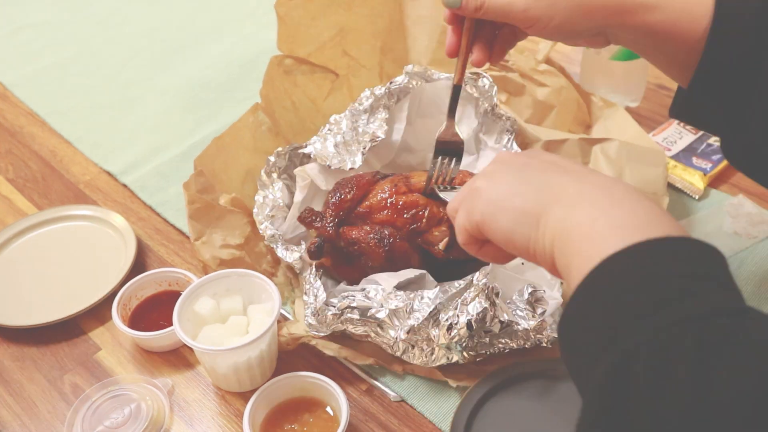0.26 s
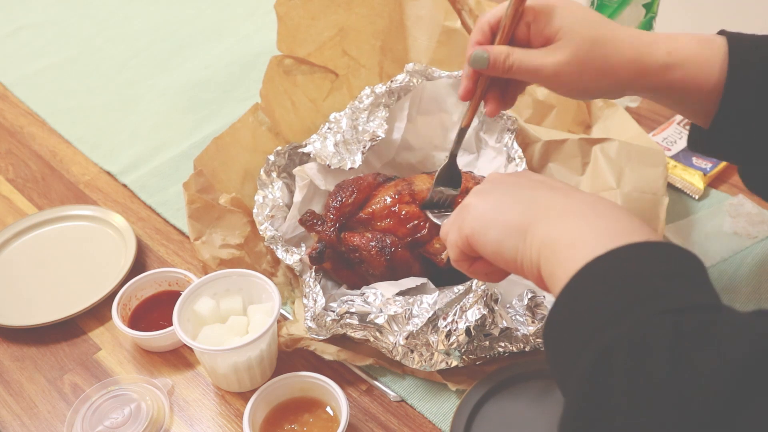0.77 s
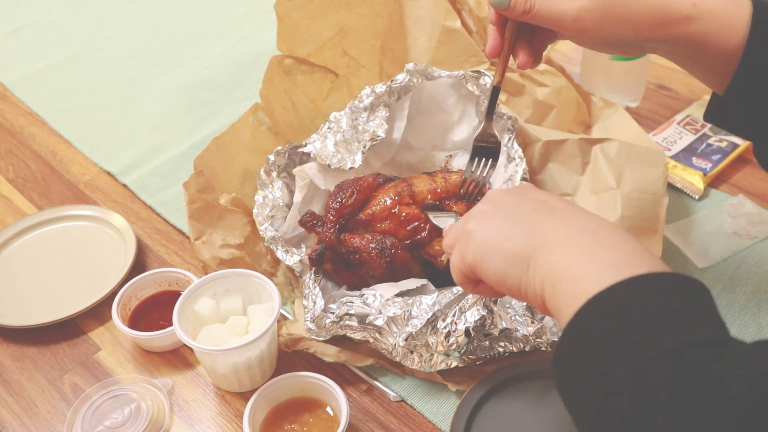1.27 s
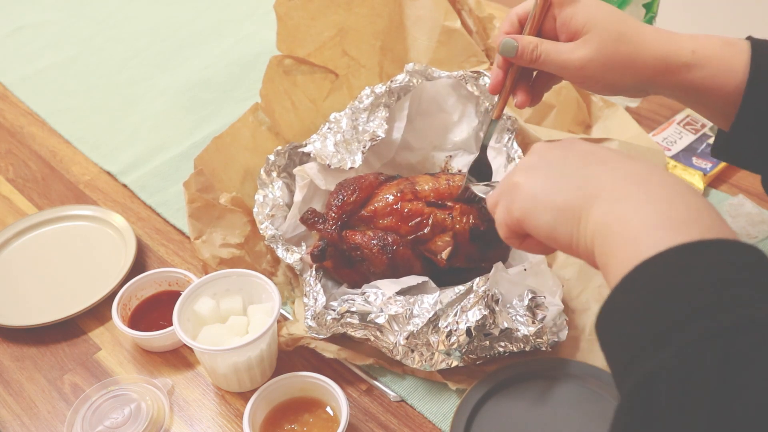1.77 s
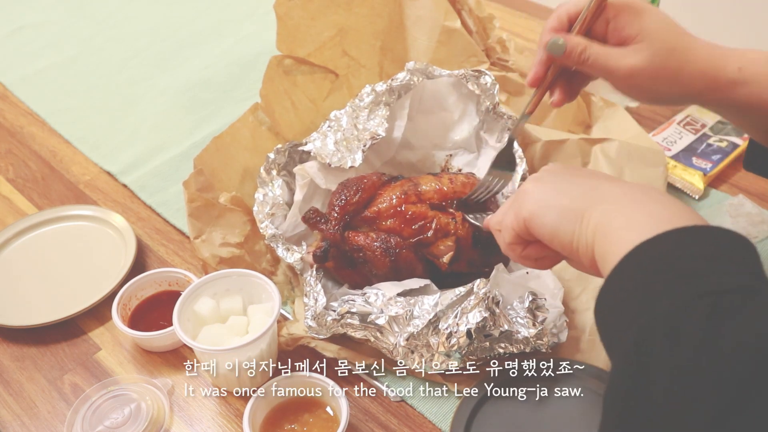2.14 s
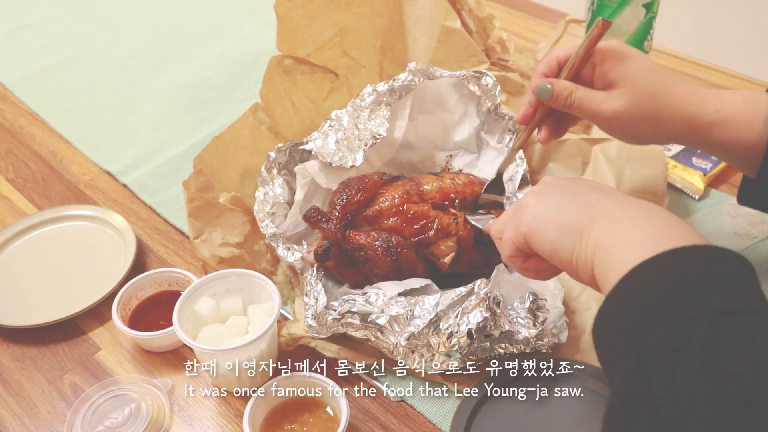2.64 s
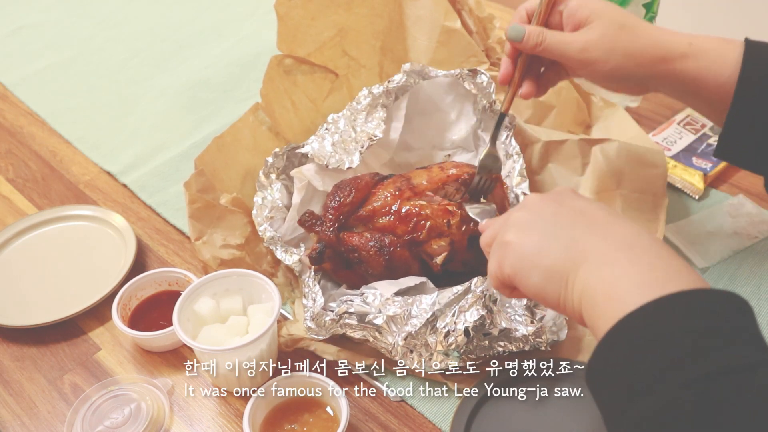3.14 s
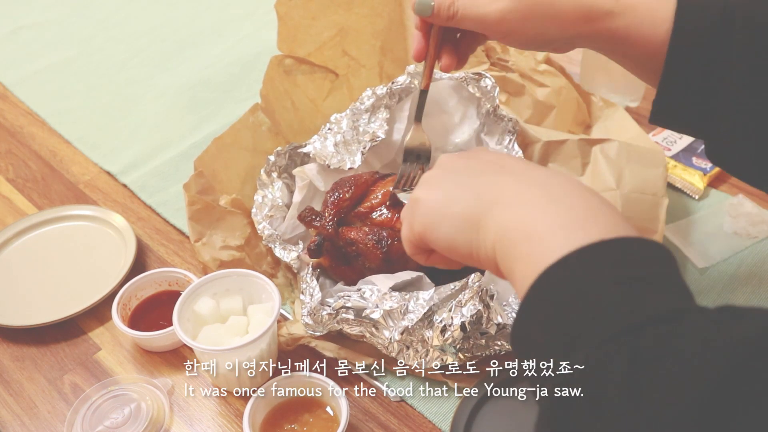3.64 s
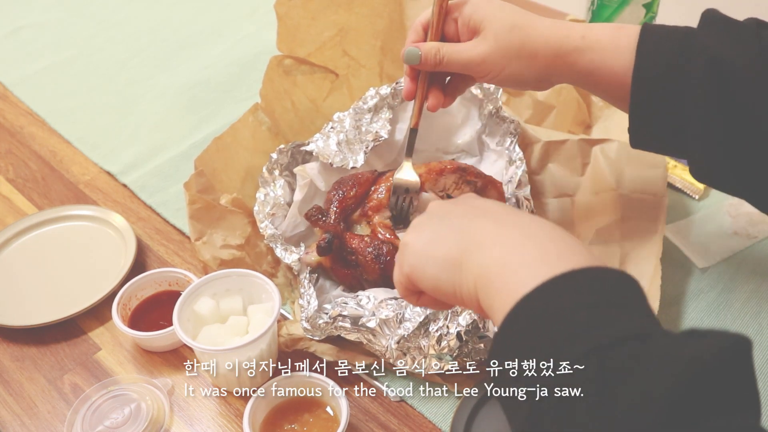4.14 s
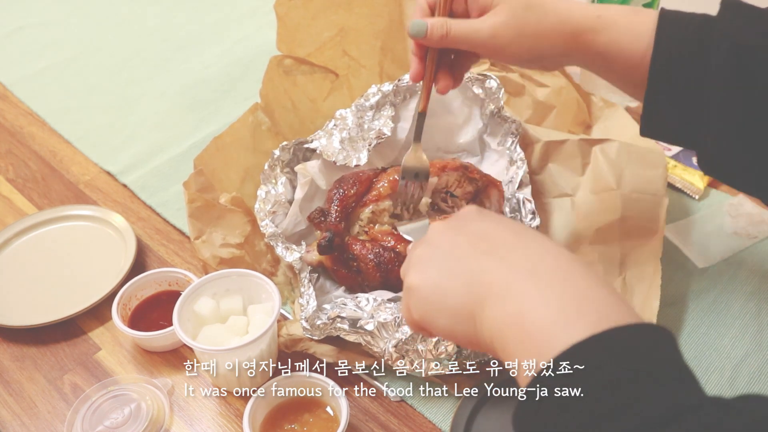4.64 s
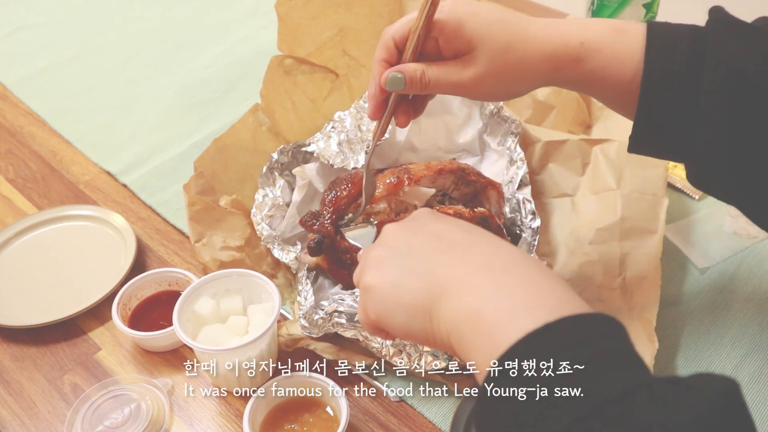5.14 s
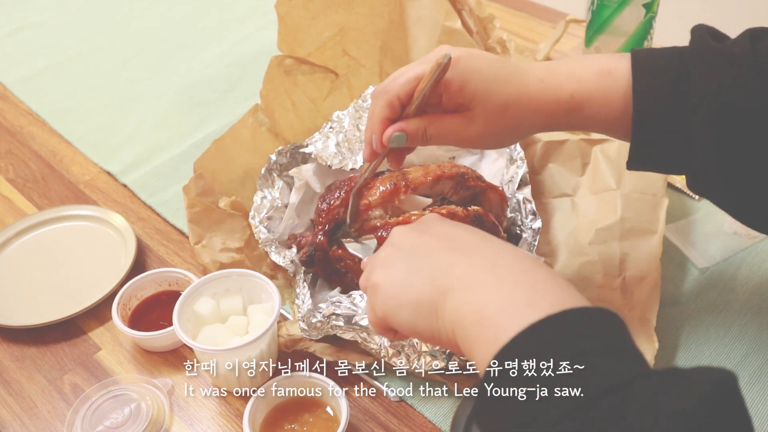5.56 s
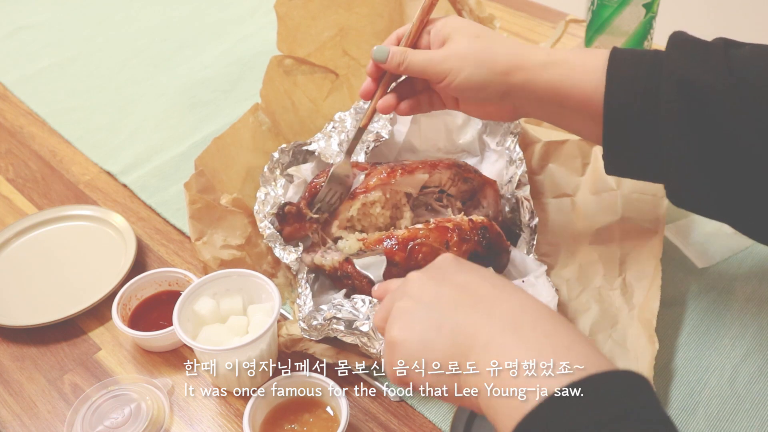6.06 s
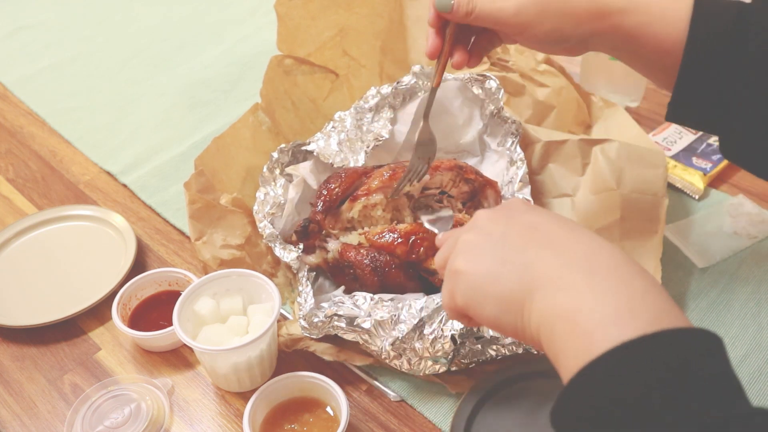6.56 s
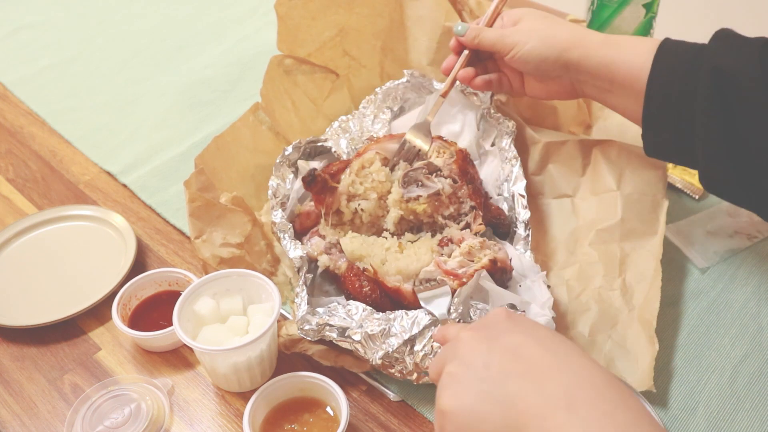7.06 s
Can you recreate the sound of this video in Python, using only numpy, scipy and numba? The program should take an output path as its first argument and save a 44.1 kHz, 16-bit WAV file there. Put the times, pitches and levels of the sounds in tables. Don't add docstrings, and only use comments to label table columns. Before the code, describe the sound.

Crisp foil rustle opens, drops to small ticks, then thickens into crackling clusters around two and three seconds. Pulling the meat open brings denser crumpling after four seconds, low table bumps, a tiny metallic ring and scattered hard snaps. A short, busy scraping drag follows near seven seconds, then it settles. Close camera pickup in a small, quiet room with faint air hiss and appliance hum.

```python
import sys
import numpy as np
from scipy import signal
from scipy.fft import rfft, irfft
from scipy.io import wavfile
from scipy.ndimage import uniform_filter1d
from numba import njit

SR = 44100
rng = np.random.default_rng(int(sys.argv[2]) if len(sys.argv) > 2 else 0)


def gain_from_db(level_db):
    decades = np.asarray(level_db, float) / 20
    return 10 ** decades


def transcribe(signal):
    frames = np.atleast_2d(signal).T
    limited = np.clip(frames, -1, 1)
    pcm = np.round(limited * 32767).astype(np.int16)
    wavfile.write(sys.argv[1], SR, pcm)


N = 322371

# lowest pitch in Hz, highest pitch in Hz, decay in ms.
FACETS = [(904, 2928, 0.94), (2820, 7470, 0.77), (6840, 15900, 0.25)]
# lowest pitch in Hz, highest pitch in Hz, decay in ms, level in dB over large facets.
BUNDLE_THUD = (176, 751, 8, -16)
# frequency in Hz, level in dB.
TABLE_TONE = [(25, -45), (60, -6), (190, 2.5), (400, 0.5), (800, -5.5), (1600, -10), (4000, -25)]
# frequency in Hz, level in dB.
AIR_TONE = [(25, -19), (60, 4), (200, -9), (1000, -3.5), (3300, -42), (5200, -6), (9000, -17), (15000, -21)]
AIR_DB = -55.5
# frequency in Hz, rms level in dB.
HUM = [(119, -65), (237, -62)]
# frequency in Hz, gain in dB.
MIC_TONE = [(40, -28), (250, -6), (950, -4.5), (1300, -4), (4000, 1), (5800, 2), (7200, -3), (8250, -3),
            (10400, -0.5), (13200, -7.5), (15600, -20)]
# frequency in Hz, level in dB.
ECHO_TONE = [(200, -3.5), (1000, 3.5), (3500, -3), (5200, 2), (7500, -0.5), (12000, -7.5), (16000, -13)]
ROOM_T60_S, ROOM_DB = 0.36, -15
TOP_HZ = 15700
# pitch in Hz, decay in ms, level in dB over the rustle.
DRAG = (6.69, 7.1, [(960, 7.2, -10.5), (5600, 0.46, -10.5)])

# start in seconds, strongest ring in Hz, energy in dB, brightness in dB.
CRACKS = [(0.4171, 2900, -20, -8), (.541, 9730, -32, 19), (0.864, 5600, -30, 3), (1.295, 3050, -14, -36),
          (2.0686, 4300, -8.5, 4), (2.0052, 2880, -16, -9), (2.0237, 2150, -8, -5), (2.748, 5600, -20, 12),
          (2.7521, 5900, -5.5, 3), (2.851, 5740, -13.5, 23), (2.922, 4500, -8.5, 15),
          (2.9434, 4470, -7.5, -1), (2.954, 5400, -11, -16), (4.1331, 8900, -18.5, 21),
          (4.5071, 3000, -10.5, 6), (4.891, 2740, -19, -17), (5.0195, 7400, -5.5, 22),
          (5.467, 12000, -2, 7.5), (5.483, 2850, -8, -4), (4.2958, 3260, -12, -1), (4.302, 2940, -14, 1),
          (4.415, 5000, -12.5, 9), (6.7401, 6100, -17.5, -6), (6.7541, 2500, -12, -7),
          (6.7775, 5750, -12.5, -1), (6.2251, 6000, -4, 34), (6.371, 5400, -20, -6),
          (6.8262, 5600, -13.5, 5), (6.983, 7600, -12.5, 7), (7.05, 4000, -12.5, 1),
          (7.1644, 1170, -13, -8)]
# start in seconds, strongest ring in Hz, energy in dB, brightness in dB.
SHORT_CREASES = [(.062, 3530, -20, 16), (0.101, 2180, -13, 0), (0.7686, 5300, -18, 3),
                 (0.8726, 5060, -17, -6), (1.5093, 4650, -11.5, 0.5), (1.56, 7460, -12, 14),
                 (1.6488, 2960, -10, -5), (1.8514, 3900, -13, 22), (2.051, 6500, -6, 15),
                 (2.271, 11800, -27, 17), (2.4564, 5400, -22.5, 1), (2.8829, 1030, -9.5, -21),
                 (2.9852, 1840, 0, -8), (2.9966, 1900, 0.5, 4.5), (4.261, 4550, -14.5, -6),
                 (4.4096, 2280, -6, -8), (4.4417, 5430, -13, 1), (5.35, 2770, -13, -17),
                 (5.367, 4840, -16.5, 2), (5.6587, 3300, -10.5, 0), (5.6664, 1860, -3, 2.5),
                 (5.8714, 2950, -19, 3), (5.986, 3830, -9.5, -8), (6.9297, 1130, -8.5, -1),
                 (7.234, 5950, -21.5, -19)]
# start in seconds, strongest ring in Hz, energy in dB, brightness in dB.
CRUMPLES = [(0.1234, 1550, -13, -20), (0.9151, 4960, -9.5, 3), (1.2084, 5070, -16.5, -2.5),
            (1.5875, 4650, -14, 1), (2.024, 4370, -11, -6), (2.2883, 4380, -22, -9),
            (2.669, 5600, -22.5, 0), (3.3512, 2740, -17, -12), (3.8895, 5100, -21, -1),
            (3.929, 2720, -23, -8), (4.1792, 950, -16.5, -6), (4.312, 2980, -13, -6), (4.33, 3230, -14, -4),
            (4.4705, 3240, -17.5, -8), (4.8777, 4300, -20, 8), (4.9774, 2660, -13, 4.5),
            (5.0076, 7350, -7, 25), (5.2693, 2760, -38, -13), (5.448, 1120, -13.5, -11),
            (5.913, 4730, -17, -1), (5.9688, 5400, -2.5, 6), (6.158, 5600, -18, -4), (7.021, 5640, -14, -6),
            (7.098, 6500, -14.5, 5), (7.1724, 3430, -19, -27)]
# start in seconds, strongest ring in Hz, energy in dB, brightness in dB.
FOLDS = [(0.8936, 2760, -14, 2), (1.2225, 4670, -24.5, -7), (1.4635, 3380, -22, 11), (1.502, 5500, -16, -1),
         (1.61, 2290, -13, -17), (2.035, 5600, -10, -10), (2.056, 4470, -12, -1.2),
         (2.5422, 1090, -18.5, -2.5), (3.1348, 2640, -9.5, -8.5), (3.333, 2450, -18.5, -18),
         (3.7597, 4640, -31, -7), (3.937, 1110, -7.5, 0.8), (4.2019, 6000, -17.5, 10),
         (4.252, 1910, -12.5, -13), (4.3852, 2680, -2.5, -9), (4.6553, 4150, -19.5, -2),
         (5.152, 3200, -11, -22), (5.6987, 1030, -3, -6), (5.7993, 2310, -17, -17),
         (5.961, 2720, -9.5, -12), (6.8562, 990, -9.5, -5), (6.996, 1010, -8.5, -7),
         (6.952, 4600, -14.5, -1), (7.261, 3400, -28, -9)]
# start in seconds, strongest ring in Hz, energy in dB, brightness in dB.
TICKS = [
    (1.759, 10800, -30, 17),
    (3.512, 2960, -31, -11),
    (5.233, 6500, -30, 4),
    (6.533, 2100, -38, -12),
    (6.611, 2930, -41, -4),
]
# start in seconds, strongest ring in Hz, energy in dB, brightness in dB.
POPS = [(0.5591, 5100, -37, -6), (0.841, 1610, -35, -11), (1.2256, 6310, -27, -7), (1.5803, 5280, -15, 7),
        (1.851, 8760, -13, 20), (1.8623, 3810, -32, 7), (2.0823, 2000, -6.5, -26), (2.9111, 4520, -13, 9),
        (2.9493, 10340, -14, 7), (3.903, 1590, -27, -7), (3.9555, 5430, -22, 3), (4.1028, 5660, -19.5, 21),
        (4.1111, 5790, -29, 9), (4.2206, 1420, -21, -3), (4.2505, 1940, -15, -15), (4.6488, 1400, -27, -18),
        (5.2745, 6050, -26, -3), (5.4747, 3400, -13.5, -10), (5.9594, 2760, -17, -17),
        (6.005, 3210, -12, -15), (6.2998, 3400, -23, -6), (6.9416, 3100, -10.5, 5), (7.086, 3490, -16, 4),
        (7.3041, 2840, -25.5, -14)]
# start in seconds, strongest ring in Hz, energy in dB, brightness in dB.
KINKS = [(0.0116, 6160, -20.5, 6), (0.0747, 4350, -29, -2), (0.1133, 2410, -11.5, -2),
         (0.3641, 2280, -37, -15), (0.534, 2610, -35, -6), (0.6639, 6220, -28, -1), (0.7006, 1140, -32, -3),
         (0.7292, 4540, -27, -4), (1.0035, 4090, -20.5, -2), (1.0524, 2840, -22, 10), (1.431, 5040, -27, 1),
         (1.4394, 5380, -19.5, 1), (1.487, 1660, -18.5, -17), (1.5576, 4520, -12, 4),
         (1.711, 4540, -29, -8), (1.8026, 4090, -24.5, -7), (2.4666, 1610, -24, -11),
         (2.5549, 3530, -22.5, -5), (2.5877, 4090, -21.5, 2), (2.7252, 1590, -17, -10),
         (2.8646, 5530, -28, 3), (3.039, 3250, -20, -11), (3.0454, 2090, -20, -10), (3.1638, 2410, -18, -4),
         (4.3212, 1980, -13, -23), (4.3563, 1610, -13, -8), (4.4211, 2330, -17, -5),
         (4.5007, 2200, -18.5, 0), (4.628, 3270, -26, -11), (4.74, 2150, -16, -17),
         (4.7467, 4480, -19, -12), (4.792, 2240, -26, -14), (4.813, 2670, -30, -14), (5.0008, 6500, -29, 4),
         (5.0559, 1420, -25, -3), (5.4797, 4650, -23, -5), (5.645, 4630, -20, -3), (5.7122, 5340, -10.5, 1),
         (5.8104, 2670, -23, -20), (5.8494, 5490, -30, -3), (6.099, 2780, -27, -8), (6.73, 6240, -20, -6),
         (6.88, 4690, -12, 1), (6.9703, 1290, -8.5, -8), (7.057, 2840, -17.5, -2),
         (7.1784, 1940, -10.5, -14)]
SPREADS_MS = (3.1, 5.4, 8.1, 11.8, 6.5, 1.6, 4.6)
MIDDLE_DB = (-7.5, 3, -9)

# peak in seconds, rustle in dB, swell in seconds, fade in seconds, large facets in dB over rustle.
FORK_STROKES = [(0.0, -16.5, .05, 0.036, -3.5), (0.119, -24, 0.11, 0.086, -3.5), (.44, -48, 0.82, 0.2, 0),
                (.57, -37.5, 0.045, 0.13, 3.5), (.76, -34, 0.18, 0.086, 1.5), (.91, -27.5, 0.067, 0.079, -8),
                (1.0, -38.5, 0.11, 0.24, -2.5), (1.22, -34.5, 0.045, .12, -11), (1.31, -38.5, 0.12, 0.22, 4),
                (1.47, -30, 0.097, 0.27, 3), (1.58, -27.5, 0.086, 0.34, 2), (1.7, -38, 0.11, 0.049, 7),
                (1.871, -28.5, 0.058, 0.38, 0.5), (2.046, -18.5, 0.12, 0.05, -1.5), (2.2, -42, 0.42, 0.46, 2.5),
                (2.55, -33, 0.25, 0.24, 5), (2.75, -25.5, 0.025, 0.32, 3), (2.99, -25, 0.35, 0.079, 2),
                (3.15, -28, 0.033, 0.17, 1), (3.35, -36.5, 0.2, 0.14, 2.5), (3.569, -35.5, 0.082, 0.097, 6),
                (3.8, -40, 0.12, 0.63, 1), (3.94, -21, 0.082, 0.11, -6.5),
                (4.12, -35, 0.06, 0.75, -2), (4.21, -35, 0.11, .08, 6), (4.255, -27, .03, 0.12, 12),
         (4.315, -19, 0.12, 0.21, 3.5), (4.39, -18.5, 0.17, 0.054, 0), (4.65, -27.5, 0.08, 0.13, 3),
         (4.744, -24, 0.15, 0.08, 6.5), (5.01, -26.5, 0.11, 0.11, -2.5), (5.16, -33, 0.086, .15, 1),
         (5.27, -39, 0.15, 0.29, -1), (5.37, -31.5, 0.2, 0.19, 6.5), (5.48, -29.5, 0.13, 0.17, -16),
         (5.707, -20, 0.14, 0.074, -3), (5.91, -20, 0.042, 0.11, 5), (6.0, -38.5, 0.47, 0.39, 1),
         (6.161, -29, 0.046, 0.14, 5), (6.24, -27.5, 0.2, 0.31, -4), (6.37, -38.5, 0.44, 0.035, 3),
         (6.7, -38, .03, 0.09, 5.5), (6.753, -17, 0.051, 0.23, -1.5), (6.862, -16, 0.048, 0.32, -5),
         (6.97, -29, 0.12, 0.29, -4), (7.081, -21, 0.32, 0.13, 1), (7.169, -16.5, 0.036, 0.082, 0),
         (7.25, -42, .1, .3, 9)]
REST_DB = (-51.5, -61, -61)
LINGER = (0.98, 0.81, 1)
SMALL_DB = -6.5

# time in seconds, rumble in dB.
PRESSURE = [(0.0, -42), (.3, -46.5), (.62, -40.5), (.95, -41), (1.25, -38), (1.55, -31), (1.82, -35),
            (2.0, -31), (2.3, -38), (2.55, -29.5), (2.97, -33.5), (3.05, -45.5), (3.8, -43.5), (4.22, -32),
            (4.45, -41), (5.0, -34.5), (5.7, -32.5), (6.3, -44)]
STROKE_SHARE = 0.17
# time in seconds, extra rumble in dB.
BUMPS = [
    (1.5, 3),
    (2.0, 3.5),
    (2.75, 5),
    (4.21, 3.5),
    (5.0, 2.5),
    (5.7, 6.5),
    (6.16, 5),
    (7.17, -6),
]
BUMP_S = 0.022
# start in seconds, ring in Hz, energy in dB.
THUMPS = [(1.509, 340, -11), (1.63, 410, -19), (1.99, 190, -15), (2.054, 360, -27), (2.46, 170, -18),
          (2.75, 200, -17), (2.75, 370, -11), (2.815, 340, -21), (2.878, 600, -14.5), (2.936, 500, -21),
          (4.203, 190, -22), (4.249, 290, -18), (4.999, 240, -21), (5.155, 800, -15), (5.655, 560, -14.5),
          (5.697, 500, -22)]
# start in seconds, ring in Hz, energy in dB.
TINES = [
    (5.206, 4600, -32),
    (5.238, 4620, -25.5),
    (5.24, 2760, -29),
    (5.259, 4570, -31),
    (5.262, 2740, -31),
    (5.3185, 4630, -29),
]
THUMP_CYCLES, TINE_MS = 2.5, 4.5
SHIVER_MS, SHIVER_DB = 3.13, -5.5


@njit
def ring(start, hz, tau, size, length):
    out = np.zeros(length + 8192)
    for k in range(len(start)):
        turn = np.exp(2j * np.pi * hz[k] / SR - 1 / tau[k])
        z = size[k] + 0j
        for i in range(start[k], start[k] + min(int(6 * tau[k]), 8000)):
            out[i] += z.imag
            z *= turn
    return out[:length]


def modes(s, hz, decay_ms, energy):
    start = np.clip(s * SR, 0, N - 1).astype(np.int64).ravel()
    size = np.sqrt(4 * energy / decay_ms) * rng.choice([-1, 1], hz.shape)
    return ring(start, hz.ravel(), decay_ms.ravel() * SR / 1000, size.ravel(), N)


def colour(x, points):
    hz, db = np.transpose(points)
    bins_hz = np.arange(1, 2050) * SR / 4096
    log_gain = np.interp(np.log(bins_hz), np.log(hz), db) * np.log(10) / 20
    ceps = irfft(log_gain)
    ceps[1:2048] = 2 * ceps[1:2048]
    ceps[2049:] = 0
    return signal.fftconvolve(x, irfft(np.exp(rfft(ceps))))[:len(x)]


def unit(x):
    return x / np.sqrt(np.mean(x ** 2))


def walk(rate):
    hold = int(SR / rate)
    return uniform_filter1d(np.repeat(rng.standard_normal(N // 50), hold)[:N], hold)


def room_air_and_hum():
    t = np.arange(N) / SR
    hum = 0
    for hz, db in HUM:
        hum = hum + gain_from_db(db + 1.0 + 0.67 * walk(13)) * np.sin(2 * np.pi * hz * t)
    return unit(colour(rng.standard_normal(N), AIR_TONE)) * gain_from_db(AIR_DB) + hum


def room_echo(x):
    t = np.arange(SR // 2) / SR
    fade = gain_from_db(-60 * t / ROOM_T60_S) * np.clip(t / 0.0017, 0, 1)
    tail = colour(rng.standard_normal(len(t)), ECHO_TONE) * fade
    return signal.fftconvolve(x, tail / np.sqrt(np.sum(tail ** 2)))[:N] * gain_from_db(ROOM_DB)


def strokes():
    t = np.arange(0, N + 64, 64) / SR
    s, db, swell, fade, large_db = np.transpose(FORK_STROKES)[:, :, None]
    drop_db = 20 * np.where(t < s, (s - t) / swell, (t - s) / fade)
    levels = []
    for rest_db, linger, size_db in zip(REST_DB, LINGER, (large_db, 0, SMALL_DB)):
        power = gain_from_db(2 * rest_db) + gain_from_db(2 * (db + size_db - drop_db / linger)).sum(axis=0)
        levels.append(np.interp(np.arange(N) / SR, t, 10 * np.log10(power)))
    return levels


def hand_pressure(large_db):
    t = np.arange(N) / SR
    rumble_db = np.interp(t, *np.transpose(PRESSURE)) + STROKE_SHARE * (large_db + 36.5)
    for s, db in BUMPS:
        rumble_db += db * np.exp(-((t - s) / BUMP_S) ** 2)
    return rumble_db


def table_rumble(db):
    return unit(colour(rng.standard_normal(N) * gain_from_db(2.5 * walk(30)), TABLE_TONE)) * gain_from_db(db)


def paired_rings(s, hz, db, decay_ms, width):
    chance = rng.random((len(s), 2, 2))
    starts = s + .002 * chance[:, 0]
    pitch = hz * (1 + width * (chance[:, 1] - .5))
    return modes(starts, pitch, decay_ms + np.zeros(pitch.shape), gain_from_db(2 * db) / 2)


def meat_thumps():
    s, hz, db = np.transpose(THUMPS)[:, :, None]
    return paired_rings(s, hz, db, THUMP_CYCLES * 1000 / hz, .16)


def fork_tines():
    s, hz, db = np.transpose(TINES)[:, :, None]
    return paired_rings(s, hz, db, TINE_MS, .02)


def bundle_drag(db, count=700):
    t0, t1, rings = DRAG
    chance = rng.random((3, count))
    s = t0 + (t1 - t0) * chance[0]
    out = 0
    for hz, decay, ring_db in rings:
        pitch = hz * (1 + 0.084 * (chance[1] - .5))
        rung = modes(s, pitch, decay * (.5 + chance[2]), np.ones(count))
        time_share = np.sqrt((t1 - t0) * SR / N)
        out = out + unit(rung) * time_share * gain_from_db(ring_db + db + 3.5 * walk(22))
    return out


def crackle(levels_db, count, scatter_db, cap_db, clump_db, spread_ms, axis):
    chance = rng.random((count, 9, axis + 1))
    delay = (.3 + chance[:, 7, :1]) * chance[:, 7, 1:] ** 2
    s = chance[:, 0, :1] * N / SR + spread_ms / 1000 * delay
    size_db = np.minimum(-scatter_db * np.log(1 - chance[:, 0, 1:2]), cap_db) + np.zeros(axis)
    clumps = clump_db * walk(60)
    out = 0
    for k, ((lo_hz, hi_hz, decay), db) in enumerate(zip(FACETS, levels_db)):
        pitch = lo_hz * (hi_hz / lo_hz) ** chance[:, 1 + k, 1:]
        taste_db = size_db + 9 * chance[:, 8, k % axis, None]
        grains = modes(s, pitch, decay * (0.25 + chance[:, 4 + k, 1:]), gain_from_db(2 * taste_db))
        out = out + unit(grains * gain_from_db(clumps + 2.27 * walk(30))) * gain_from_db(db)
    return out


def rustle(levels_db):
    fizz = crackle(levels_db, count=24000, scatter_db=-0.5, cap_db=11, clump_db=4.0, spread_ms=.5, axis=1)
    crunch = crackle(levels_db, count=900, scatter_db=2.0, cap_db=8.0, clump_db=1.0, spread_ms=6, axis=8)
    return fizz * gain_from_db(-4.0) + crunch * gain_from_db(-8)


def list_creases():
    groups = (CRACKS, SHORT_CREASES, CRUMPLES, FOLDS, TICKS, POPS, KINKS)
    rows = []
    for group, spread in zip(groups, SPREADS_MS):
        for s, hz, db, bright in group:
            home = (hz > FACETS[1][0]) + (hz > FACETS[2][0])
            shares = np.array([min(-bright, 0), MIDDLE_DB[home], min(bright, 0)])
            rows.append((s, hz, *(db + shares - shares.max()), spread))
    return rows


def crease_snaps(count=12, lead=.3, stagger=.8, slow=.07):
    s, hz, *energy_db, spread = np.transpose(list_creases())[:, :, None]
    chance = rng.random((len(s), 4, 4, count))
    chance[:, 0, 0].sort(axis=1)
    chance[:, 1, 0].sort(axis=1)
    sudden = np.clip((10 - spread) / 6, 0, 1)
    early = chance[:, 0, 0] ** 2
    gradual = (chance[:, 0, 0] + chance[:, 1, 0]) / 2
    jerks = s + stagger * spread / 1000 * (sudden * early + (1 - sudden) * (1.4 * gradual - .3))
    first_hardest = np.exp(-2.2 * sudden * early)
    kinds = FACETS + [BUNDLE_THUD[:3]]
    energy_db.append(energy_db[0] + BUNDLE_THUD[3])
    out = 0
    for k, ((lo_hz, hi_hz, decay), db) in enumerate(zip(kinds, energy_db)):
        order, place, share, damp = np.moveaxis(chance[:, k], 1, 0)
        step = (np.argsort(place * damp, axis=1) + place) / count
        pitch = lo_hz * (hi_hz / lo_hz) ** step
        share = share * first_hardest
        if k == 1:
            share = share * pitch ** np.clip(0.097 * (energy_db[2] - energy_db[0]), -2.5, 2.5)
        share = share / share.sum(axis=1, keepdims=True)
        home = (hz[:, 0] >= lo_hz) & (hz[:, 0] < hi_hz) & (k < 3)
        pitch[home, 1:7:4] = hz[home] * (.97 + .06 * place[home, :2])
        share[home] *= 1 - lead
        share[home, 1:7:4] += lead * np.array([.6, .4])
        out = out + modes(jerks, pitch, (decay + slow * spread) * (.5 + damp), share * gain_from_db(2 * db))
    return out


def sheet_shiver(x):
    ms = np.arange(2048) / SR * 1000
    tail = rng.standard_normal(len(ms)) * np.exp(-ms / SHIVER_MS) * np.clip(ms / 1.4, 0, 1)
    return signal.fftconvolve(x, tail / np.sqrt(np.sum(tail ** 2)))[:N] * gain_from_db(SHIVER_DB)


def scene():
    levels_db = strokes()
    rumble_db = hand_pressure(levels_db[0])
    snaps = crease_snaps()
    foil = snaps + rustle(levels_db) + bundle_drag(levels_db[1]) + meat_thumps() + fork_tines()
    lift_db = 0.63 * (uniform_filter1d(rumble_db, size=SR // 4) + 46.0)
    background = room_air_and_hum() * gain_from_db(lift_db) + table_rumble(rumble_db - 4.0)
    heard = colour(foil + room_echo(foil), MIC_TONE) + colour(sheet_shiver(snaps), MIC_TONE)
    return (background + heard)[None]


def low_pass(x):
    return signal.sosfilt(signal.butter(12, 16450, fs=SR, output="sos"), x)


def record(dry):
    rounded = dry / (1 + dry ** 4) ** .25
    top_cut = signal.ellip(6, .2, 27, TOP_HZ, fs=SR, output="sos")
    mix = np.clip(signal.sosfilt(top_cut, rounded), -1, 1)
    return low_pass(mix)


dry = scene()
out = record(dry)
transcribe(out)
```